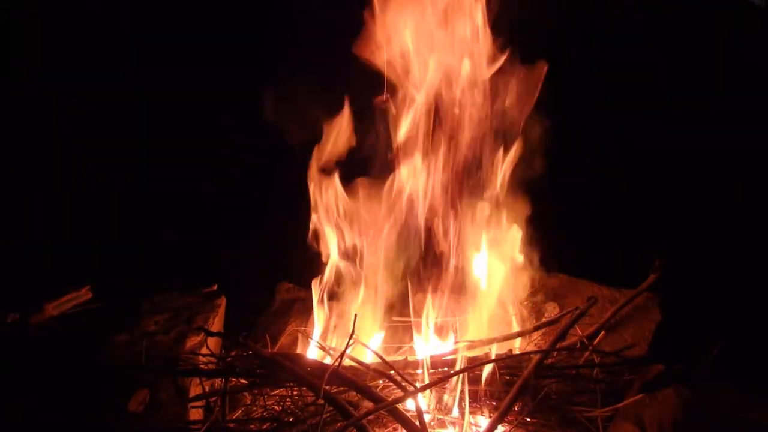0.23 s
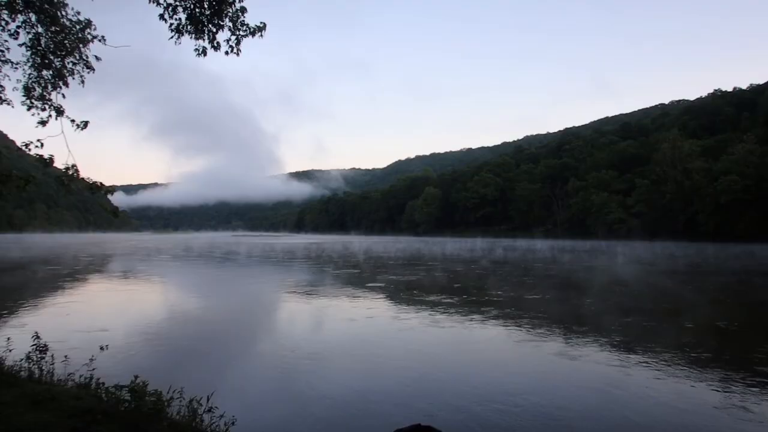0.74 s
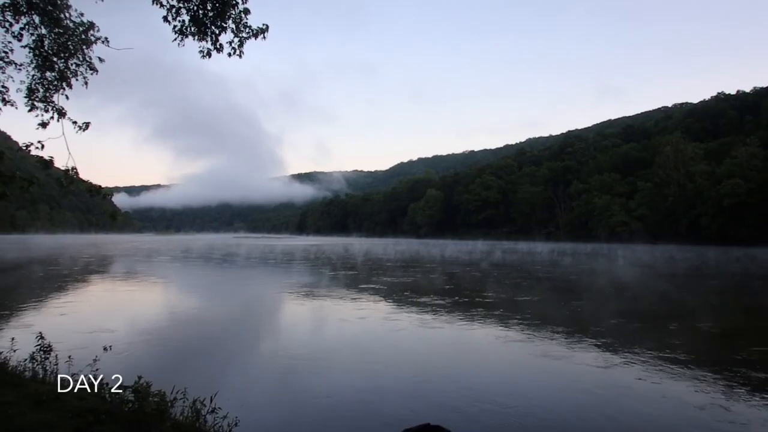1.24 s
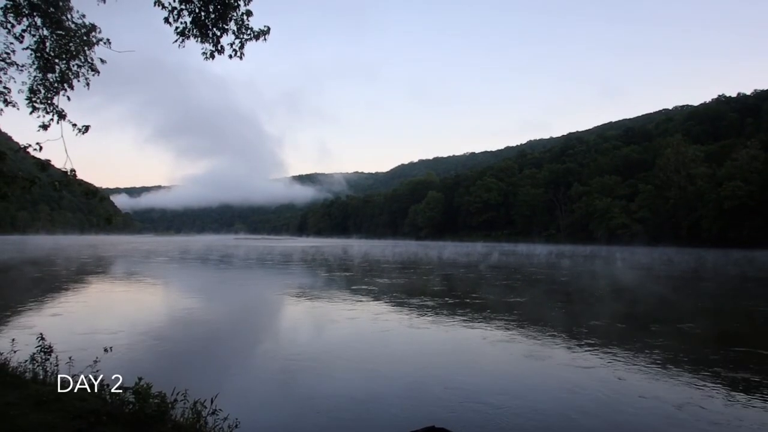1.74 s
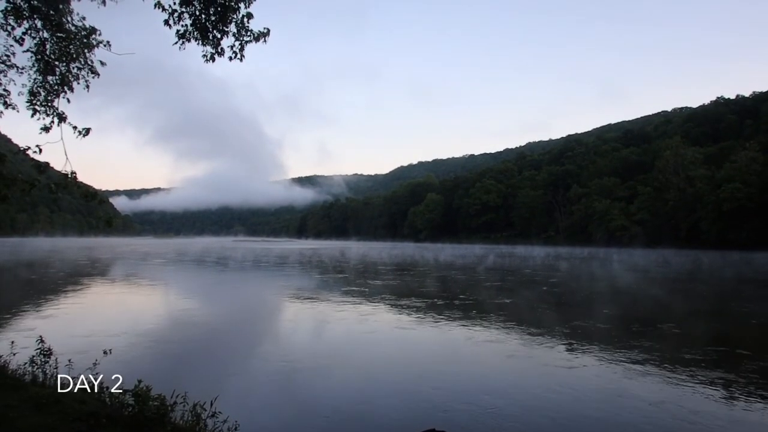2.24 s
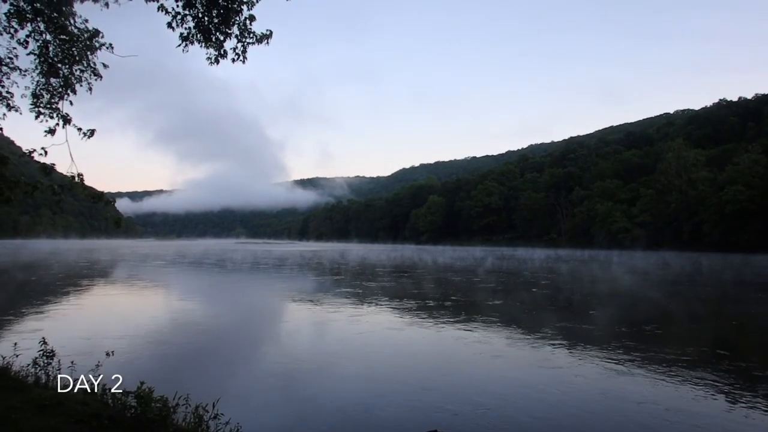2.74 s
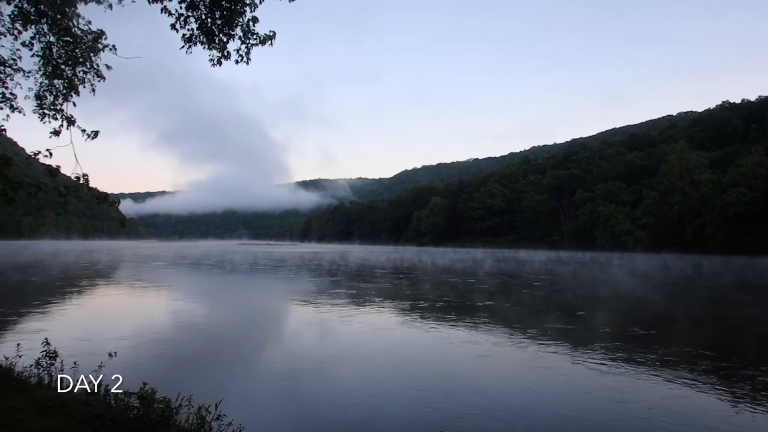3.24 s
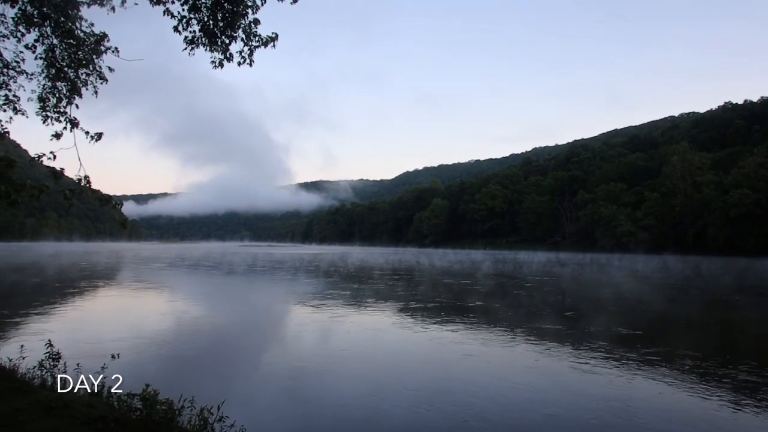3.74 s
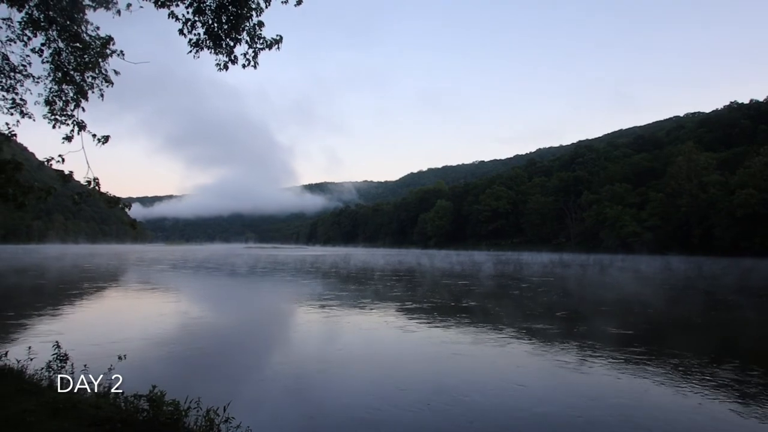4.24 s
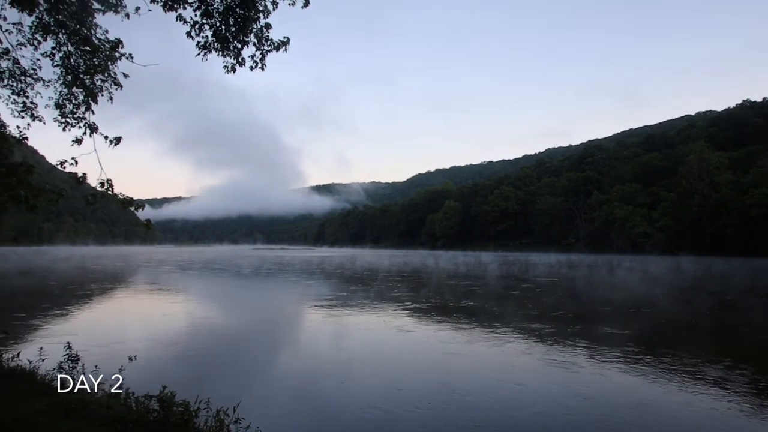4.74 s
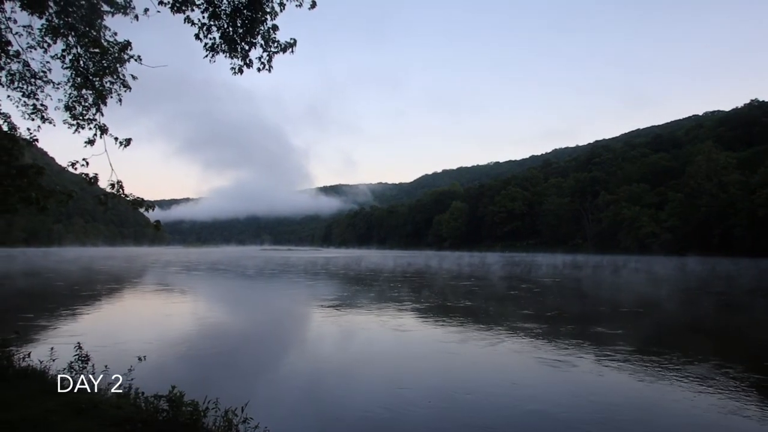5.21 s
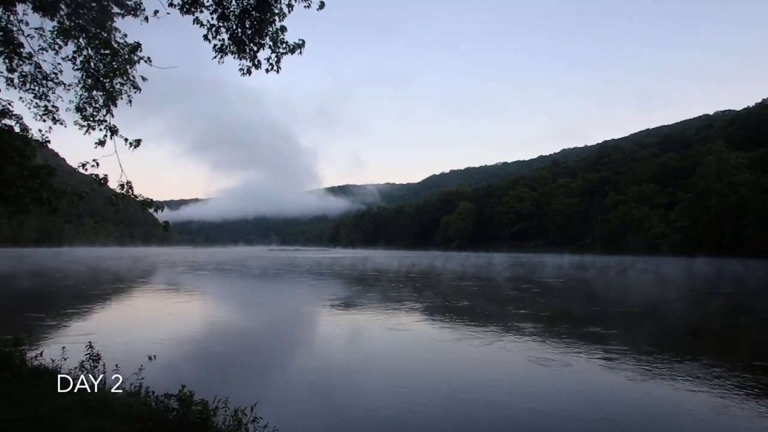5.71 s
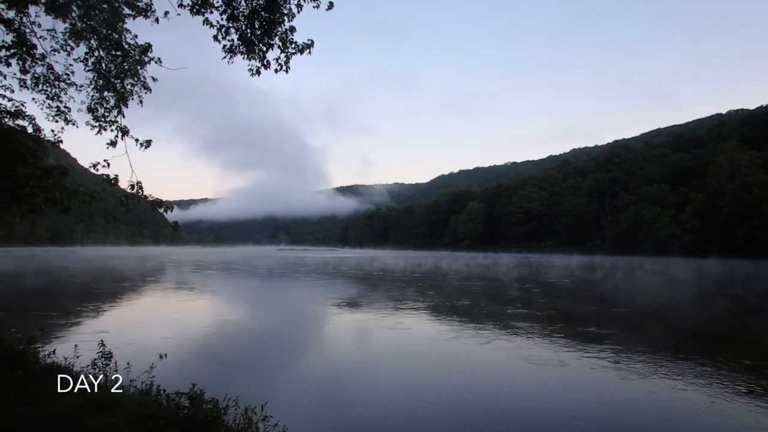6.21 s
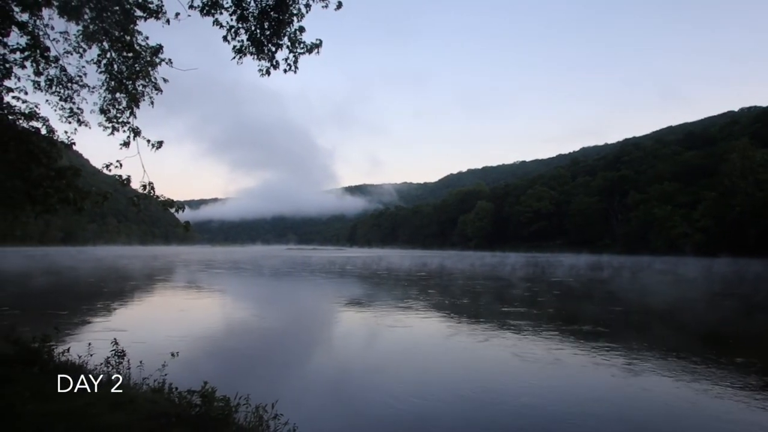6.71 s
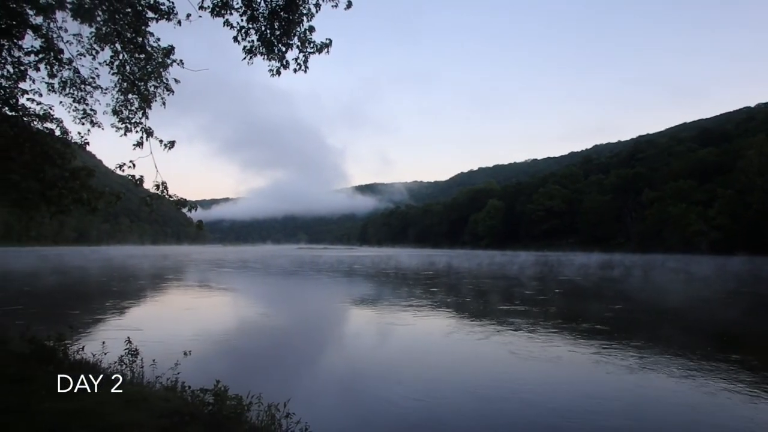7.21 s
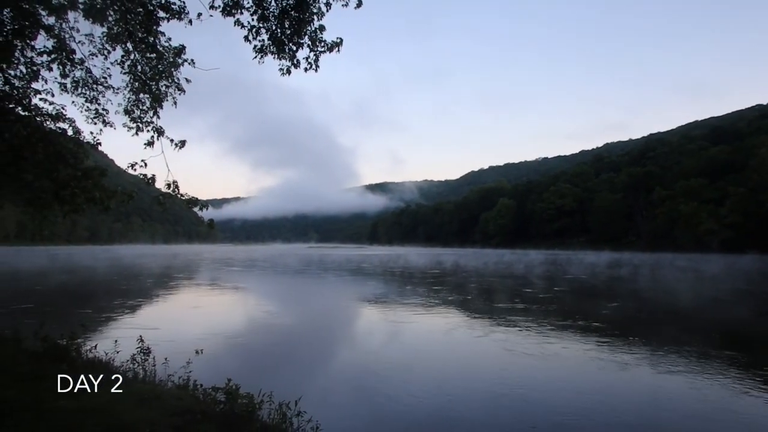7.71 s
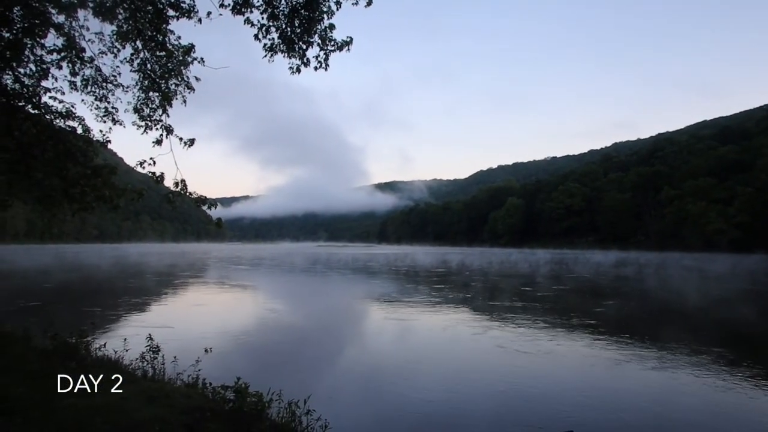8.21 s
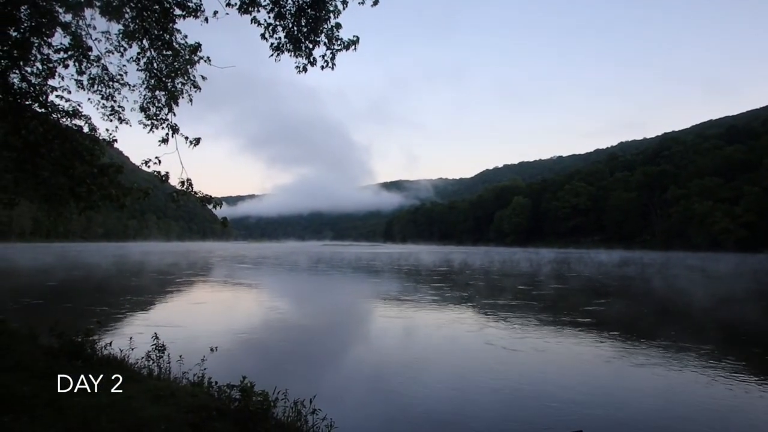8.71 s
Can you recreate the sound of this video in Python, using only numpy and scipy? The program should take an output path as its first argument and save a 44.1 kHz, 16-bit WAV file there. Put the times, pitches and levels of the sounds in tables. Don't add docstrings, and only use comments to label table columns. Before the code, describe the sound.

Close crackling fire snaps abruptly to a hushed misty river: a songbird's short whistled phrases, distant hoarse calls, and low wind buffeting the microphone.

```python
import sys
import numpy as np
from scipy import signal
from scipy.fft import rfft, irfft, next_fast_len
from scipy.io import wavfile
from scipy.ndimage import uniform_filter1d

SR = 44100
rng = np.random.default_rng(int(sys.argv[2]) if len(sys.argv) > 2 else 0)


def dump(signal):
    limited = np.clip(np.atleast_2d(signal).T, -1, 1)
    pcm = np.round(limited * 32767).astype(np.int16)
    wavfile.write(sys.argv[1], SR, pcm)


def nominal_scale(level):
    x = np.asarray(level, float) / 20
    return 10 ** x


N = 394694
T = np.arange(N) / SR


def level(x, db):
    return x * nominal_scale(db) / np.sqrt(np.mean(x ** 2))


def colour(x, spectrum):
    hz, db = np.transpose(spectrum)
    size = next_fast_len(N)
    log_hz = np.log(np.fft.rfftfreq(size, 1 / SR) + 1)
    gain = nominal_scale(np.interp(log_hz, np.log(hz), db, -90, -90))
    return irfft(rfft(x, size) * gain, size)[..., :N]


# (frequency [Hz], gain [dB])
STEADY_RANGE = [(10, 0), (14470, 0)]


def steady_range(x):
    return colour(x, STEADY_RANGE)


def walk(rate, channels=1):
    k = int(SR / rate)
    held = np.repeat(rng.standard_normal((channels, N // k + 1)), k, axis=1)
    return 1.3 * uniform_filter1d(uniform_filter1d(held, k), k)[:, :N]


def noise(likeness):
    mid, side = rng.standard_normal((2, N))
    share = np.clip(likeness, 0, 1)
    return np.sqrt(1 + share) * mid + np.sqrt(1 - share) * side * np.array([[1], [-1]])


def pan(x, db):
    return x * nominal_scale(np.array([db, -db]).reshape(2, -1) / 2)


def woods(x, t60_s, likeness, onset_s=0.007):
    t = T[:SR]
    clumps = nominal_scale(3.5 * walk(60)[:, :SR])
    decay = np.exp(-np.log(1000) * t / t60_s)
    onset = 1 - np.exp(-(t / onset_s) ** 2)
    tail = noise(likeness)[:, :SR] * clumps * decay * onset
    return signal.fftconvolve(x[None], tail / np.sqrt(np.sum(tail ** 2) / 2))[:, :N]


def whistle(syllables, edge_s=0.004, smooth_s=0.0033, hoarse=0.0):
    out = np.zeros(N)
    wobble = 1 + hoarse * walk(120)[0]
    for rows in syllables:
        s, hz, db = np.transpose(rows)
        on = slice(int((s[0] - edge_s) * SR), int((s[-1] + edge_s) * SR))
        t = T[on]
        glide = np.interp(t, s, hz)
        pitch = uniform_filter1d(glide, int(smooth_s * SR), mode="nearest") * wobble[on]
        edge = np.clip(np.minimum(t - t[0], t[-1] - t) / (2 * edge_s), 0, 1)
        tone = np.sin(2 * np.pi * np.cumsum(pitch) / SR)
        out[on] += np.sqrt(2) * nominal_scale(np.interp(t, s, db)) * edge * tone
    return out


def singers(centre_hz, octaves, count, swing_db=5):
    pitch = centre_hz * 2 ** (octaves * walk(22, channels=count))
    loudness = nominal_scale(swing_db * np.minimum(walk(9, channels=count), 1.1))
    tones = np.sin(2 * np.pi * np.cumsum(pitch, axis=1) / SR)
    voices = np.sum(loudness * tones, axis=0)
    return level(voices + nominal_scale(7.5) * woods(voices, 1.0, 0.94), 0)


# (frequency [Hz], level per Hz [dB])
AIR_SPECTRUM = [(24, -31), (40, 0), (74, -12), (196, -15.5), (233, -17), (443, -16.5), (1420, -26.5),
                (2170, -36.5), (2390, -29.5), (3140, -18.5), (4560, -35), (13200, -31), (15000, -32.5)]


def air():
    return level(colour(noise(0.21), AIR_SPECTRUM), -49)


# (frequency [Hz], gain [dB])
VALLEY_SPECTRUM = [(300, -8), (700, 3), (1200, 1), (1450, 2.5), (1650, -0.5), (2150, -9.5), (2400, 0),
                   (2900, -9), (3700, -7.5), (4000, -5), (4300, -16), (5000, -11), (5600, -9.5),
                   (7000, -11)]
# (time [s], level [dB])
TWITTER_LEVEL = [
    (.8, -67),
    (2.4, -67),
    (2.7, -91),
    (4.4, -85),
    (4.6, -70),
    (5.0, -84),
]


def chorus():
    hush = level(noise(0.75) * nominal_scale(0.8 * walk(3)), 3)
    blur = level(colour(singers(3200, 0.35, count=9) + hush, VALLEY_SPECTRUM), -51.5)
    twitter_gain = nominal_scale(np.interp(T, *np.transpose(TWITTER_LEVEL)))
    twitter = singers(5600, 0.067, count=4, swing_db=10.0) * twitter_gain
    return pan(blur + twitter, -1.7)


# (time [s], peak level [dB], left minus right [dB])
PORT_SLAPS = [
    (4.582, -44, -19),
    (7.05, -30, -6),
    (7.142, -41, -6),
    (7.154, -40, -6),
    (7.189, -39, -6),
    (7.223, -36, -9),
    (7.453, -33, -12),
    (7.695, -34, 0.0),
    (8.01, -40, -10),
]


def slaps():
    out, t = np.zeros((2, N)), T[:1024]
    pitch = 95 + 230 * np.exp(-t / 0.005)
    thump = -np.sin(2 * np.pi * np.cumsum(pitch) / SR)
    push = thump * np.exp(-t / 0.007) * (1 - np.exp(-t / 0.0012))
    for when, db, side_db in PORT_SLAPS:
        start = int(when * SR)
        out[:, start:start + len(t)] += pan(push, side_db) * nominal_scale(db + 1.5)
    return out


# (frequency [Hz], level per Hz [dB])
RUMBLE_SPECTRUM = [(15, -6), (35, -9.5), (65, 1), (110, -6), (170, -14), (300, -32)]
# (frequency [Hz], level per Hz [dB])
FLUTTER_SPECTRUM = [(80, -54), (150, -3), (250, -4.5), (400, -11), (700, -17.5)]
# (peak time [s], rumble level [dB], half length [s], left minus right [dB])
PORT_GUSTS = [(1.09, -45.5, 0.02, -9), (1.615, -51, 0.13, -6), (2.257, -43, 0.098, -5.5),
              (2.547, -42.5, 0.04, -11), (3.295, -55.5, 0.075, -45), (3.716, -38.5, 0.082, -6),
              (3.916, -39.5, 0.11, -3), (4.46, -42.5, 0.12, -7), (4.787, -36.5, 0.11, -6.5),
              (5.12, -35.5, 0.11, -3.5), (5.495, -41.5, 0.18, -1.5), (5.9, -43.5, 0.46, 7.5),
              (6.486, -34, 0.12, -3.5), (6.81, -36.5, 0.13, -0.5), (7.038, -30, 0.08, 0),
              (7.408, -44, 0.29, -8), (7.7, -45.5, 0.079, 11), (7.988, -32.5, 0.073, -6.5),
              (8.314, -41.5, 0.15, -2.5)]


def wind():
    breeze, breeze_pan_db = nominal_scale(-53), -3.5
    power, lean = breeze ** 2, 0
    for peak_s, db, half_s, pan_db in PORT_GUSTS:
        swell = nominal_scale(db) * np.exp(-((T - peak_s) / half_s) ** 2 / 2)
        power = power + swell ** 2
        lean = lean + swell ** 2 * (pan_db - breeze_pan_db)
    force = np.sqrt(power)
    rumble = level(colour(noise(0.45), RUMBLE_SPECTRUM), 0)
    rumble = rumble * nominal_scale(2 * walk(11, channels=2) + 1.5 * walk(14))
    flutter_gain = nominal_scale(-56) / force * (force / breeze) ** 0.055
    flutter = level(colour(noise(0.19), FLUTTER_SPECTRUM), 0) * flutter_gain
    flutter = flutter * nominal_scale(2.83 * walk(25, channels=2))
    return pan(rumble + flutter, breeze_pan_db + lean / power) * force + slaps()


# (frequency [Hz], level per Hz [dB])
BUZZ_SPECTRUM = [(9300, -27), (9550, 0), (9800, -22), (12300, -10), (13000, -6), (13150, -10), (13650, -8),
                 (13800, 1.5), (13950, -12), (14400, -18)]
# (start time [s], end time [s], level [dB])
BUZZ_BOUTS = [
    (1.95, 2.6, -61),
    (5.896, 6.72, -59.5),
]


def insect(edge_s=0.12):
    bouts = np.zeros(N)
    for start, end, db in BUZZ_BOUTS:
        bouts += nominal_scale(db) * np.clip(np.minimum(T - start, end - T) / edge_s, 0, 1)
    return level(colour(noise(0.3), BUZZ_SPECTRUM), 0) * bouts * nominal_scale(3.0 * walk(12))


# (time [s], peak level [dB], top pitch [Hz])
FAR_CAWS = [(0.9, -42, 1468), (1.169, -50.5, 1462), (1.488, -42, 1469), (1.755, -51.5, 1460),
            (2.12, -42.5, 1480), (2.345, -50, 1457), (2.835, -40.5, 1453), (3.821, -43.5, 1478),
            (4.115, -53, 1477), (4.242, -45.5, 1465), (4.4756, -49.5, 1450), (4.802, -43.5, 1463),
            (5.0848, -52, 1457), (5.5158, -43, 1450), (5.775, -56, 1444), (6.027, -43.5, 1428),
            (6.327, -42.5, 1432), (6.575, -48, 1440), (6.845, -41.5, 1520), (6.9692, -44, 1487),
            (7.1823, -43.5, 1515), (7.574, -39.5, 1490), (7.6594, -48, 1454), (7.9573, -47, 1470),
            (8.0194, -55, 1450), (8.217, -43, 1467), (8.866, -43.5, 1503)]


def caws(length_s=0.0793):
    # (share of length, share of pitch, level [dB])
    shape = [(-.1, .82, -16), (.15, .94, -6), (.42, 1, -3), (.7, .94, -5), (1.0, .84, -11)]
    arches = [[(s + at * length_s, share * top_hz, db + step_db) for at, share, step_db in shape]
              for s, db, top_hz in FAR_CAWS]
    voice = whistle(arches, 0.008, 0.012, hoarse=0.017) * nominal_scale(2.5 * walk(70)[0])
    voice = voice + nominal_scale(-11.0) * np.roll(voice, int(0.1 * SR)) \
        + nominal_scale(-11.5) * np.roll(voice, int(0.27 * SR))
    echoes = nominal_scale(-2.5) * woods(voice, 0.8, 0.95)
    return pan(voice + echoes, -0.64) * nominal_scale(-4.5)


# (time [s], length [s], start pitch [Hz], end pitch [Hz], level [dB])
FAINT_CHIPS = [(.89, 0.027, 5130, 5460, -56), (1.672, 0.024, 3490, 3900, -50),
               (1.805, 0.03, 5600, 5800, -56), (2.055, .025, 5270, 5800, -55),
               (2.639, 0.053, 3350, 3400, -57), (2.688, 0.025, 3950, 3500, -51),
               (2.727, 0.02, 3950, 3700, -51), (2.915, 0.02, 3950, 3700, -51), (2.77, .03, 6700, 4530, -55),
               (2.809, 0.018, 5200, 6050, -56), (2.96, 0.022, 6040, 4430, -59),
               (3.003, .014, 5300, 5800, -60), (5.392, 0.032, 3400, 3980, -54),
               (6.527, .014, 2830, 2830, -46), (7.593, 0.019, 4150, 4000, -45),
               (4.665, 0.02, 3900, 3450, -50), (1.3, .03, 3000, 3400, -54), (1.5, .03, 3100, 3800, -55),
               (1.9, .025, 3300, 4300, -55), (1.74, .04, 3700, 3200, -56), (8.3, .025, 2900, 3350, -54),
               (6.067, 0.024, 3160, 3320, -52), (8.634, 0.011, 2290, 2700, -51),
               (8.646, 0.01, 2650, 2380, -52), (8.574, .018, 2400, 2650, -53), (8.73, .02, 3300, 3500, -54),
               (7.553, .018, 3150, 3350, -53), (5.445, .02, 3300, 3500, -54), (5.352, .012, 3900, 3400, -54),
               (4.61, .02, 7800, 8100, -64), (1.455, .015, 3900, 4050, -53), (3.05, .015, 3400, 3900, -55)]


def chips():
    slurs = [[(s, hz, db), (s + length_s, to_hz, db)] for s, length_s, hz, to_hz, db in FAINT_CHIPS]
    voice = whistle(slurs, hoarse=0.0078)
    return voice + nominal_scale(-2.5) * woods(voice, 1.0, 0.5)


# (time after its start [s], pitch [Hz], level [dB])
MOTIF = [
    [(0, 6340, -49), (.018, 6745, -51.5), (.04, 6820, -48.5), (.056, 7240, -50), (.08, 7010, -51.5)],
    [(.09, 6040, -51), (.113, 5490, -51), (.165, 5540, -54)],
    [(.216, 6910, -50), (.232, 8000, -51), (.245, 8800, -60)],
    [(.255, 8700, -60), (.268, 8000, -48.5), (.285, 7700, -52), (.305, 7670, -63)],
]
# (time [s], effort [dB])
MOTIF_ROUNDS = [
    (4.717, -7),
    (5.077, -1.3),
    (5.42, -0.5),
    (5.775, 0),
    (6.135, 0),
]


def warbler():
    motif = [[(start + s, hz, db + effort_db) for s, hz, db in rows]
             for start, effort_db in MOTIF_ROUNDS for rows in MOTIF]
    motif = motif[:-3] + [motif[-3][:2]]
    voice = whistle(motif, hoarse=0.007) * nominal_scale(3 * walk(200)[0])
    return pan(nominal_scale(-5.5) * voice + woods(voice, 0.8, 0.23), -7.0)


def pops(rows, crack_db, burst_s=0.0027):
    out, t = np.zeros((2, N)), T[:1024]
    burst = 1 / (1 + (t / burst_s) ** 4) + 0.29 * np.exp(-t / 0.0045)
    for at, db, hz, pan_db in rows:
        start = int((at + 0.0013) * SR)
        crack = -nominal_scale(crack_db) * np.exp(-t / 0.0001) * np.cos(2 * np.pi * hz * t)
        resonance = [1, -2 * 0.68 * np.cos(2 * np.pi * hz / SR), 0.45]
        grains = signal.lfilter([1], resonance, rng.standard_normal((3, len(t))), axis=1)
        splinters = 0.11 * (0.4 * grains[0] + 1.3 * grains[1:]) * burst
        out[:, start:start + len(t)] += pan(crack + splinters, pan_db) * nominal_scale(db - 1.2)
    shaded = signal.lfilter(*signal.iirnotch(4530, 4530 / 470, SR), out)
    band = signal.butter(2, [1200, 14000], "bandpass", fs=SR, output="sos")
    return signal.sosfilt(band, 0.7 * shaded + 0.3 * out)


# (time [s], peak level [dB], brightest pitch [Hz], left minus right
# [dB])
BANK_TICKS = [
    (0.7973, -26, 8000, -3),
    (5.442, -38, 7000, 0),
    (7.839, -44, 5500, 0),
    (7.972, -43, 6200, 0),
    (8.406, -43, 6000, 0),
    (8.511, -41, 5900, 0),
]


def bank_ticks():
    return pops(BANK_TICKS, -5, burst_s=0.0015)


# (time [s], roar level [dB])
FIRE_LEVEL = [
    (0, -41.5),
    (.09, -42),
    (.16, -44.5),
    (.26, -42),
    (.4, -40.5),
    (.5, -41.5),
    (.64, -39),
    (.8, -41.5),
]
# (frequency [Hz], level per Hz [dB])
ROAR_SPECTRUM = [(12, -43), (20, -16), (60, -0.5), (135, -2.5), (277, -12), (330, -15.5), (666, -19),
                 (2100, -29), (2730, -42), (4620, -120)]
# (frequency [Hz], level per Hz [dB])
HISS_SPECTRUM = [(880, -25), (1500, -10), (1770, -15), (2160, -18), (2340, -2), (2500, -4), (3120, -4.5),
                 (3890, -5), (4540, -12), (5660, -7), (6180, -8), (6610, -7.5), (10300, -14.5),
                 (13900, -16), (15000, -37)]
# (time [s], peak level [dB], brightest pitch [Hz], left minus right [dB])
CRACKS = [(0.0475, -27, 5500, 0), (0.0713, -28, 5000, 0.0), (0.096, -29, 6000, 0), (0.1122, -6.5, 5730, -2),
          (0.163, -23.5, 6500, -5), (0.1875, -33, 8500, -0.5), (0.2285, -30, 5000, -0.5),
          (0.256, -25, 8900, -3), (0.2745, -26.5, 2400, -1), (0.281, -21, 9514, 0), (0.3072, -34, 3810, 2),
          (0.3366, -38, 8000, -2), (0.3678, -30, 8484, -1), (0.3805, -19, 6450, -5), (0.451, -25, 9509, -3),
          (0.4755, -37, 7000, 0), (0.5584, -18.5, 7000, -2), (0.5712, -27, 8000, 0),
          (0.6222, -22, 8000, -3), (0.702, -18.5, 6500, 0), (0.7685, -30, 9000, 0)]
# (time [s], peak level [dB], brightest pitch [Hz], left minus right [dB])
TEARS = [(0.03, -21, 5500, -1.5), (0.3535, -24, 5500, -2.5), (0.4118, -22, 3000, -1.5),
         (0.437, -29, 2600, 0), (0.5177, -22.5, 6500, 3), (0.6088, -23.5, 3500, -1.5),
         (0.665, -26, 7000, -0.6), (0.6832, -18, 5710, -2), (0.7515, -28, 6000, 0), (.637, -27, 6000, 0),
         (.195, -35, 8500, 0)]


def fire(count=260):
    roar_db = np.interp(T, *np.transpose(FIRE_LEVEL))
    roar = level(colour(noise(0.8), ROAR_SPECTRUM), 2.5) * nominal_scale(roar_db + 0.5 * walk(26.5))
    when, size, side = rng.random((count, 3)).T
    ticks = np.zeros((2, N))
    ticks[:, (when * SR).astype(int)] = pan(nominal_scale(-5.2 * np.log(size + 0.095) + 5.0), 14 * (side - 0.5))
    steam = level(noise(0.15), 0) * nominal_scale(0.6 * walk(40))
    hiss = (steam + nominal_scale(2) * ticks) * nominal_scale(-32 + 1.8 * (roar_db + 39.5))
    hiss = steady_range(colour(hiss, HISS_SPECTRUM))
    return roar + hiss + pops(CRACKS, 3.5) + pops(TEARS, -5, burst_s=0.0035)


# (pitch [Hz], level [dB])
THROAT_RESONANCE = [(2250, -36), (2450, -36.5), (2800, -41.5), (3250, -34), (3700, -32), (4300, -25),
                    (4800, -29), (5600, -31), (6500, -37.5)]
# (time [s], effort [dB])
SONG_EFFORT = [(.98, -5.5), (1.05, -1.5), (1.16, -1), (1.22, -3.5), (2.13, -6.5), (2.23, -2.5), (2.3, -3),
               (3.4, -3), (3.6, 0.6), (3.73, 1), (3.8, 0.5), (4.895, -10), (4.92, -0.5), (5.03, -0.5),
               (5.12, -5.5), (5.15, -1), (5.25, -0.5), (6.27, -1.5), (6.36, 0.9), (6.5, 0), (6.54, 2.5),
               (6.57, -3.5), (6.61, 1), (7.52, -14), (7.567, -1), (7.594, 2), (7.686, -4), (7.778, -0.3),
               (7.863, -1), (8.77, -1.5), (8.81, -4), (8.91, -2)]


def arch(top_s, rise_s, fall_s, top_hz, end_hz, start_hz, bend, onset_db):
    share = np.linspace(0, 1, 11)
    later = share[1:]
    if bend == "eased":
        up = 1 - (1 - share) ** 1.6
        down = np.cos(np.pi / 2 * later) ** 2
    else:
        up = np.sin(np.pi / 2 * share ** 1.3) ** 2 if bend == "round" else share ** bend
        sag = 1 / (1 + np.maximum(later * fall_s - 0.0024, 0) / 0.015)
        down = (sag - sag[-1]) / (1 - sag[-1])
    s = np.r_[top_s - rise_s * (1 - share), top_s + fall_s * later]
    hz = np.r_[start_hz + (top_hz - start_hz) * up, end_hz + (top_hz - end_hz) * down]
    throat_db = np.interp(hz, *np.transpose(THROAT_RESONANCE))
    effort_db = np.interp(top_s, *np.transpose(SONG_EFFORT))
    onset = np.r_[onset_db * np.minimum(3 * (1 - share), 1), np.zeros(len(later))]
    return np.c_[s, hz, throat_db + effort_db + onset]


# (top time [s], rise [s], fall [s], top pitch [Hz], end pitch [Hz])
SNAP_NOTES = [
    (.971, .013, 0.032, 4930, 2800),
    (1.155, 0.02, 0.041, 4950, 2700),
    (6.269, 0.011, 0.038, 5140, 2810),
    (8.768, 0.012, 0.0075, 4150, 3400),
]
FLICK_NOTES = [
    (1.049, 0.032, 0.047, 4150, 2760),
    (3.808, 0.041, 0.0136, 4240, 3240),
    (2.127, .012, 0.047, 3680, 2300),
    (2.287, 0.019, 0.11, 5350, 2442),
    (6.359, 0.041, 0.053, 5424, 2820),
    (4.894, 0.0027, .008, 4800, 3370),
    (7.686, 0.014, 0.032, 3870, 2475),
]
TIED_FLICK_NOTES = [
    (6.57, 0.0076, 0.025, 4150, 2466),
    (7.566, 0.022, .012, 6390, 4880),
    (7.863, 0.0236, .003, 2950, 2880),
    (8.81, 0.034, 0.03, 5000, 3070),
    (8.905, 0.058, 0.014, 5500, 4670),
]
HOOK_NOTES = [
    (3.425, .076, 0.038, 5740, 2954),
    (3.594, .067, .034, 5740, 3150),
]
WAVE_NOTES = [
    (7.778, 0.057, 0.062, 4026, 2343),
]
DOME_NOTES = [
    (4.924, 0.023, 0.041, 3770, 2660),
    (6.542, .007, 0.017, 3532, 3560),
]
LOW_DOME_NOTES = [
    (3.733, .053, 0.018, 3015, 2330),
    (5.119, .016, 0.02, 2830, 2406),
    (6.505, 0.026, 0.016, 2880, 2780),
]
HIGH_DOME_NOTES = [
    (7.52, 0.018, 0.0233, 4440, 3960),
]
TIED_DOME_NOTES = [
    (2.228, 0.054, 0.028, 3670, 3200),
    (1.222, 0.03, 0.0177, 3674, 2970),
    (6.606, 0.012, 0.01, 2543, 2510),
    (5.026, 0.061, 0.0073, 4670, 4500),
    (5.149, 0.009, 0.056, 3293, 2247),
    (5.245, 0.032, 0.022, 2930, 2830),
    (7.586, 0.006, 0.021, 4860, 4520),
]


def song():
    middle_hz, tied = 3295, None
    # (notes, start pitch [Hz], bend of the rise, onset [dB])
    kinds = [(SNAP_NOTES, middle_hz, 1.3, -7), (FLICK_NOTES, middle_hz, 1.3, -1.4),
             (TIED_FLICK_NOTES, tied, 1.3, -1.4), (HOOK_NOTES, 3560, 1.8, -1.4),
             (WAVE_NOTES, tied, "round", -1.4), (DOME_NOTES, middle_hz, "eased", -1.4),
             (LOW_DOME_NOTES, 2168, "eased", -1.4), (HIGH_DOME_NOTES, 4300, "eased", -1.4),
             (TIED_DOME_NOTES, tied, "eased", -1.4)]
    notes = [(note, start_hz, bend, onset_db) for rows, start_hz, bend, onset_db in kinds for note in rows]
    notes.sort(key=lambda item: item[0][0])
    arches, last_hz = [], middle_hz
    for note, start_hz, bend, onset_db in notes:
        arches.append(arch(*note, start_hz or last_hz, bend, onset_db))
        last_hz = note[-1]
    return arches


# (frequency [Hz], gain [dB])
SIDE_SHADING = [(1500, 0), (3950, 0), (4250, -13), (4700, -11), (5200, -3.5), (9000, 0)]


def songbird():
    voice = colour(whistle(song(), hoarse=0.004) * nominal_scale(2.6 * walk(150)[0]), SIDE_SHADING)
    direct = signal.sosfilt(signal.butter(9, 4120, fs=SR, output="sos"), voice)
    high = signal.sosfilt(signal.butter(9, 4120, "highpass", fs=SR, output="sos"), voice)
    echoes = nominal_scale(-5.5) * woods(direct, 1.0, 0.9)
    scatter = nominal_scale(-12) * high + nominal_scale(-4.5) * woods(high, 0.5, 0.55, onset_s=0.002)
    return pan(direct + echoes + scatter, -3.5) * nominal_scale(-2.0)


# (start time [s], end time [s])
DAWN_FADE = (0.7897, 0.796)


def scene():
    start_s, end_s = DAWN_FADE
    dawn = np.clip((T - start_s) / (end_s - start_s), 0, 1)
    river = air() + wind() + chorus() + insect() + caws() + chips() + warbler() + songbird()
    return (1 - dawn) * fire() + dawn * steady_range(river) + bank_ticks()


# (frequency [Hz], width [Hz])
NARROW_NOTCHES = [(2198, 200), (3103, 150), (4098, 150), (5100, 150), (6103, 200)]


def notch_bands(x):
    for hz, width_hz in NARROW_NOTCHES:
        x = signal.lfilter(*signal.iirnotch(hz, hz / width_hz, SR), x)
    return x


def low_pass(x):
    return signal.sosfilt(signal.butter(12, 15130, fs=SR, output="sos"), x)


def record(dry):
    top_cut = signal.cheby2(10, 45, 15500, fs=SR, output="sos")
    mix = signal.sosfilt(top_cut, notch_bands(dry))
    return low_pass(mix)


dry = scene()
out = record(dry)
dump(out)
```